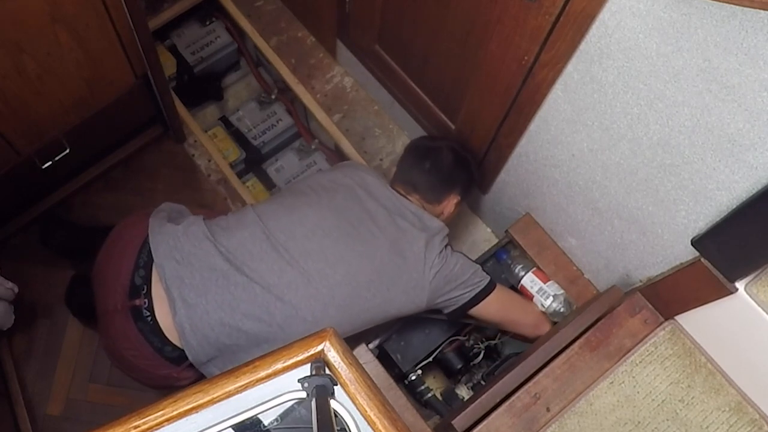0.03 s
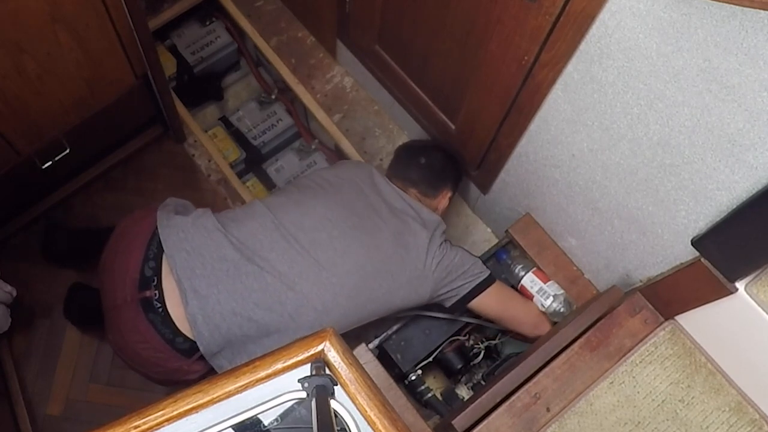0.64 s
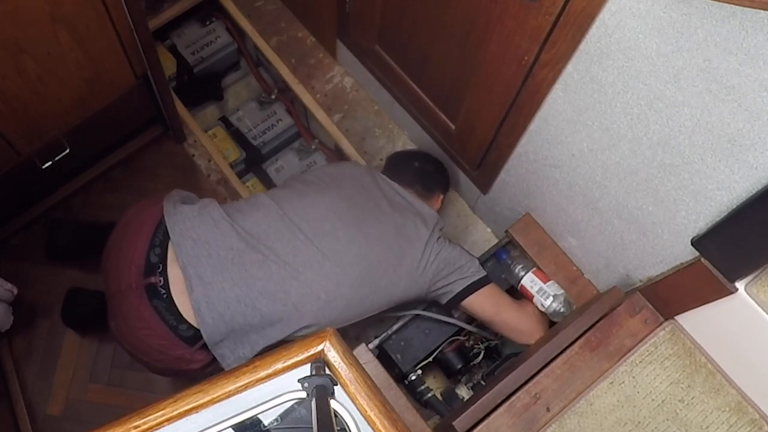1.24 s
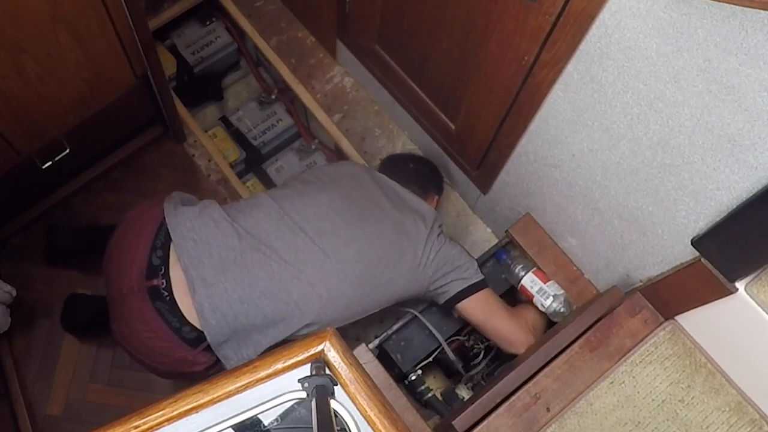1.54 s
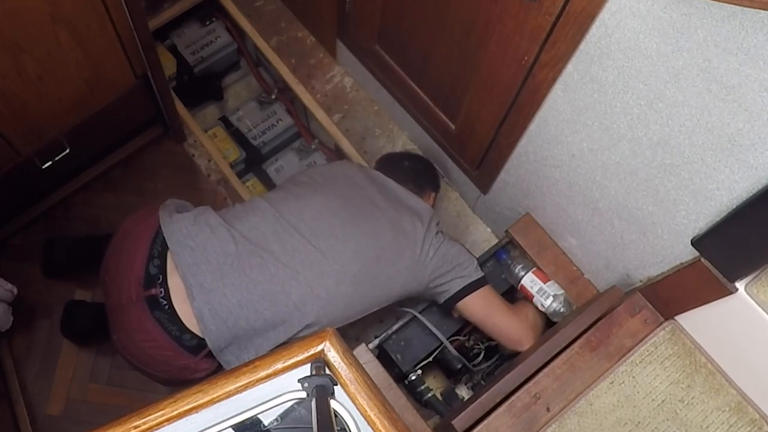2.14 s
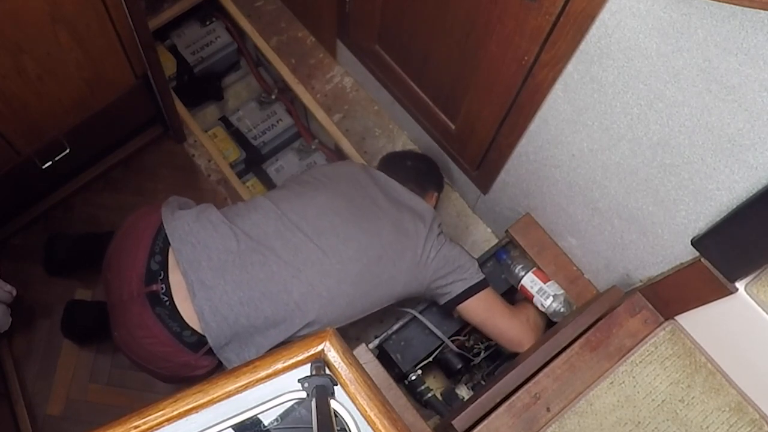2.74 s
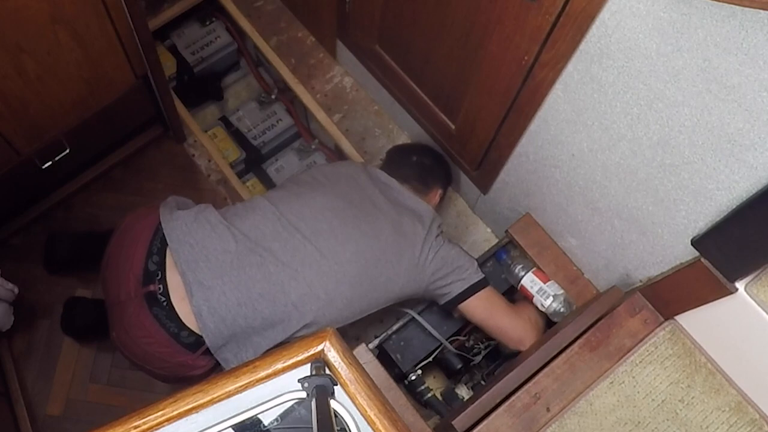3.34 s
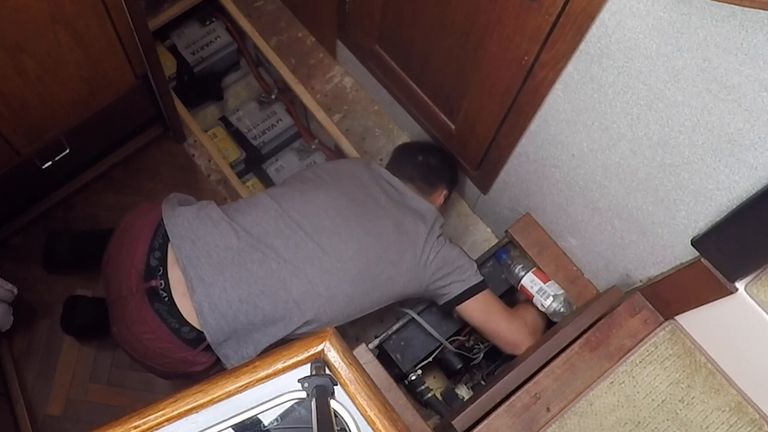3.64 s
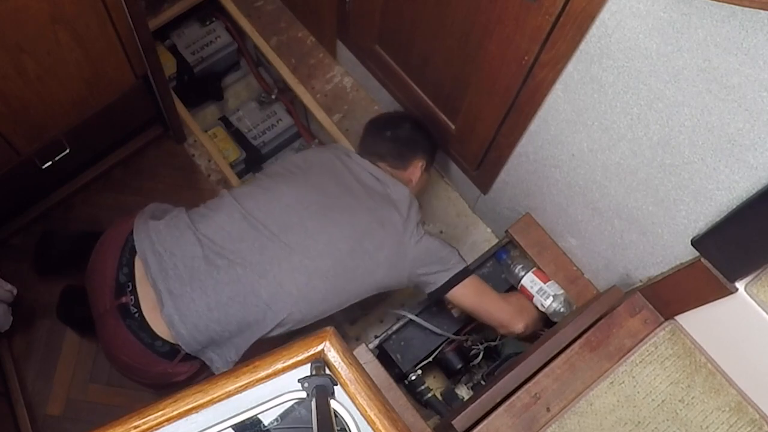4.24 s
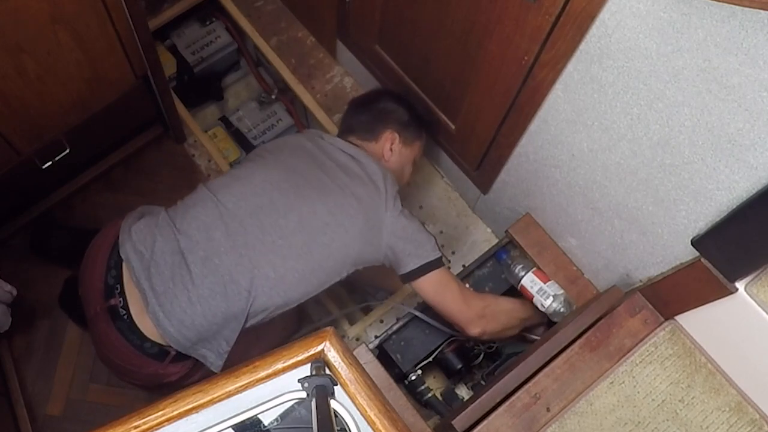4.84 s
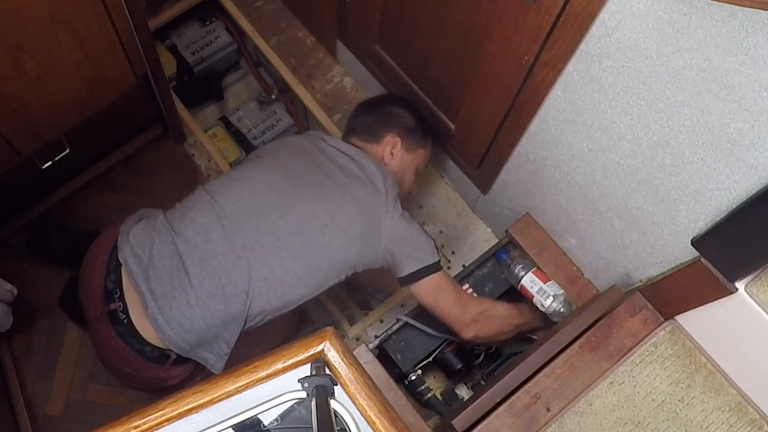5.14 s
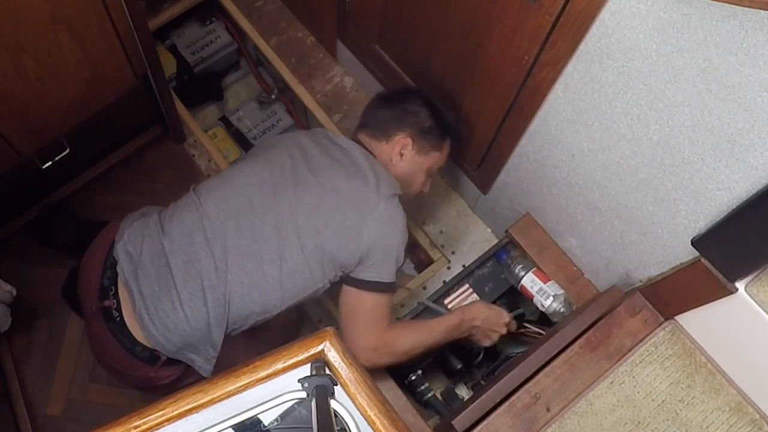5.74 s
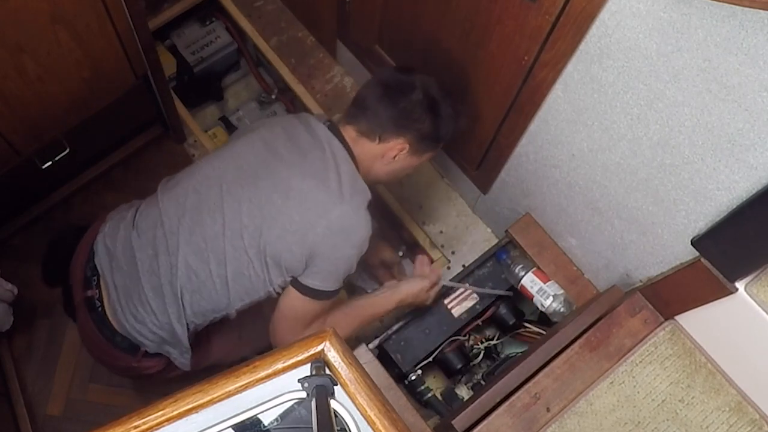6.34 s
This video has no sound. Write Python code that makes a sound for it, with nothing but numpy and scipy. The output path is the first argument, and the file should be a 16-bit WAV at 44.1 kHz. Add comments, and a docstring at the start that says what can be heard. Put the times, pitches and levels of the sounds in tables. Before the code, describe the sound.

Dull, uneven thuds boom briefly in a small wooden boat cabin as a cable is pushed around inside a tight compartment. Light clicks, hollow taps and short scrapes cluster around the thuds. The heaviest bump lands about halfway through, followed by soft sleeve brushes on wood and a busier run of ticks, knocks and dragging near the end. A low rumble and faint microphone hiss lie underneath.

```python
"""A stiff cable is worked into a cramped locker by someone kneeling in a small wooden boat cabin.
It knocks hollowly, ticks on fittings, scrapes and drags, all coloured by the locker's standing waves.
Soft blows ring the modes of hull, floorboards and locker panels; shifting weight keeps them rumbling.
Clothes rustle and brush on wood over a faint microphone hiss."""
import sys
import numpy as np
from scipy import signal
from scipy.fft import rfft, irfft, next_fast_len
from scipy.io import wavfile
from scipy.ndimage import uniform_filter1d, map_coordinates

SR = 44100
rng = np.random.default_rng(int(sys.argv[2]) if len(sys.argv) > 2 else 0)


def waveform_to_disk(signal):
    """Save audio, clipped to [-1, 1], as 16-bit WAV at the path in sys.argv[1]."""
    frames = np.transpose(np.atleast_2d(signal))
    scaled = np.clip(frames, -1, 1) * 32767
    samples = np.round(scaled).astype(np.int16)
    wavfile.write(sys.argv[1], SR, samples)


N = 282483

# Event and spectrum levels are relative.
# soft blows: t/s, floorboard/dB, hull/dB, panel/dB
BLOWS = [(0.003, -29, -17.5, -28.5), (0.552, -35.5, -36, -38), (0.615, -34.5, -28, -25),
         (0.871, -25.5, -49, -28), (0.915, -19, -24, -29), (0.978, -18, -10.5, -25),
         (1.551, -28.5, -35, -35.5), (1.637, -15.5, -14.5, -16.5), (1.691, -19, -23.5, -20),
         (1.983, -31, -31, -33.5), (2.03, -5, -11, -16.5), (2.133, -22, -19.5, -34.5),
         (2.297, -21.5, -11.5, -25.5), (2.377, -27.5, -19.5, -26), (3.213, -7, -9.5, -6),
         (3.238, -9.5, -3.5, -15.5), (3.426, -32, -24, -32.5), (3.903, -39.5, -42, -33.5),
         (3.992, -38, -29, -30), (4.091, -23, -14, -23), (4.134, -29, -28, -23.5),
         (4.249, -32, -22.5, -29.5), (4.387, -18, -18.5, -21), (4.984, -25.5, -22.5, -18),
         (5.328, -28.5, -25, -32), (5.475, -13, -16.5, -19.5), (5.857, -25, -19.5, -28),
         (6.109, -25.5, -19.5, -31.5), (6.229, -14.5, -15, -22)]
# loss of the settling bump: floorboard/dB, hull/dB, panel/dB
SETTLE_LOSS_DB = [4.5, 5, 10]
# wood modes: f/Hz, level/dB, t60/s
HULL_MODES = [(28.1, -10, 0.35), (41.6, 0.5, 0.095), (48.45, -4, 0.63), (63.7, -5.5, 0.36),
              (79.2, -8.5, 0.61)]
BOARD_MODES = [(111, -39, 0.26), (116.8, -9, 0.35), (141.7, -7, 0.33), (157.5, -3, 0.16),
               (172.75, -5, 0.25)]
PANEL_MODES = [(210.1, 5.5, 0.14), (230.2, 3.5, 0.32), (248.4, 2, 0.26), (284.2, -7, 0.25),
               (301.7, 3, 0.083), (326.8, -1.5, 0.17), (340, -2, 0.085), (428, -23, 0.11), (486, -34, 0.26)]
# arm motion, quiet reaching in, busy drawing out: t/s, cable rub/dB, cloth/dB
ARM_MOTION = [(0.0, -52.5, -58), (0.71, -51, -57.5), (0.84, -44, -57.5), (1.41, -53.5, -54),
              (2.0, -58, -58.5), (2.25, -55, -57.5), (2.51, -55, -59.5), (2.8, -58.5, -59),
              (3.14, -52, -58.5), (3.51, -58, -58.5), (3.94, -49, -55), (4.25, -46, -53), (4.64, -55, -58),
              (4.99, -55, -56.5), (5.28, -42.5, -46), (5.64, -45.5, -49.5), (5.87, -49.5, -56.5),
              (6.41, -43, -47.5)]
# ticks on fittings: t/s, level/dB, body f/Hz, sparkle/dB, ring f/Hz
FITTING_TICKS = [(0.103, -51, 2700, -42, 2660), (0.318, -39, 1500, -16, 2400),
                 (0.548, -40.5, 5800, -17, 5900), (0.595, -42, 1500, -33, 3500),
                 (0.687, -42, 2720, -38, 2680), (0.873, -32.5, 1700, -30, 2770),
                 (1.063, -38.5, 1500, -14, 2310), (1.198, -32.5, 1920, -27, 3920),
                 (1.225, -38.5, 2000, -8, 1910), (1.300, -28.5, 2300, -27, 1790),
                 (1.472, -34, 1880, -40, 2410), (1.603, -36, 1800, -25, 2540),
                 (1.708, -32.5, 2260, -31, 2380), (2.019, -36.5, 1740, -22, 1660),
                 (2.305, -31.5, 4200, -39, 4770), (2.951, -44, 4000, -16, 4500),
                 (3.141, -42, 1460, -10, 2890), (3.206, -24, 1500, -19, 7050),
                 (3.256, -31, 1380, -26, 4800), (3.314, -39, 1390, -11, 4460),
                 (3.614, -37, 2480, -25, 2550), (4.122, -38, 2200, -42, 2190),
                 (5.179, -28.5, 3700, -21, 2880), (5.316, -29.5, 1430, -15, 2260),
                 (5.362, -26.5, 1900, -23, 1860), (5.392, -26, 1440, -18, 2280),
                 (5.519, -43.5, 3860, 14, 9000), (5.613, -35.5, 2900, -19, 2200),
                 (5.769, -28.5, 3900, -27, 5130), (6.013, -29.5, 2080, -14, 2640)]
# cable knocks: t/s, level/dB, f/Hz, Q
CABLE_KNOCKS = [(0.337, -33.5, 680, 5.1), (0.699, -27.5, 757, 5.3), (0.714, -30.5, 710, 11),
                (0.795, -29.5, 617, 12), (0.842, -31, 570, 3.5), (0.911, -33, 766, 8.4),
                (1.472, -38.5, 700, 9.8), (1.604, -33.5, 1180, 4.5), (1.644, -34.5, 1040, 2.1),
                (1.986, -34.5, 614, 3.7), (2.013, -28.5, 725, 20), (2.121, -32.5, 794, 14),
                (2.137, -28.5, 483, 11.5), (2.31, -31.5, 476, 1.5), (2.339, -35.5, 1120, 6.9),
                (2.394, -28, 665, 9.6), (2.419, -32.5, 980, 18), (3.067, -35.5, 1180, 4.8),
                (3.148, -22.5, 734, 6.5), (3.179, -24, 683, 4.9), (3.215, -14.5, 375, 4.4),
                (4.053, -34.5, 1260, 9.2), (4.084, -28.5, 627, 7.1), (4.113, -31, 620, 9.9),
                (4.233, -28, 700, 6.4), (4.261, -32, 660, 5.8), (5.185, -32, 680, 6), (5.32, -26, 730, 6.3),
                (5.364, -29, 900, 20), (5.394, -19.5, 665, 11), (5.863, -32, 440, 5),
                (6.108, -32.5, 750, 5)]
# cable scrapes: t/s, length/s, level/dB, f/Hz
CABLE_SCRAPES = [(0.376, 0.06, -48, 1390), (0.6, 0.036, -46.5, 2780), (0.804, 0.049, -36, 600),
                 (0.831, 0.1, -38, 1060), (0.88, 0.1, -43, 517), (1.63, 0.11, -41, 1290),
                 (2.131, 0.072, -46, 477), (2.343, 0.053, -33, 383), (2.799, 0.19, -45, 457),
                 (3.216, 0.095, -38, 1290), (3.546, 0.12, -41.5, 452), (3.629, 0.084, -46, 2600),
                 (3.621, 0.11, -39.5, 670), (3.852, 0.06, -39, 394), (3.974, 0.052, -38, 480),
                 (4.012, 0.05, -49, 1870), (4.383, 0.065, -37.5, 680), (5.03, 0.075, -43, 1700),
                 (5.084, 0.043, -37, 680), (5.18, 0.055, -43.5, 1750), (5.317, 0.053, -29.5, 394),
                 (5.33, 0.035, -41, 1860), (5.371, .06, -38, 930), (5.668, 0.059, -43.5, 2200),
                 (6.04, 0.18, -37, 646), (6.224, 0.062, -37, 453)]
# shirt and sleeve brushes: t/s, length/s, level/dB
SLEEVE_PASSES = [(4.114, 0.21, -50.5), (4.319, 0.21, -50), (5.052, 0.15, -51.5), (6.004, 0.16, -50),
                 (6.124, 0.24, -50.5)]
# source spectra: f/Hz, level/dB
BOOM_SPECTRUM = [(30, -29.5), (70, -20.5), (100, -3.5), (120, -0.5), (170, -0.5), (240, -7.5), (275, -2.5),
                 (325, -2.5), (375, -20), (600, -23.5), (1200, -31.5), (3000, -87.5)]
HULL_SPECTRUM = [(8, -8.5), (20, -6), (30, 4), (39, -3.5), (48, 0), (58, -11), (85, -11.5), (130, -27),
                 (300, -72)]
WOODWORK_SPECTRUM = [(60, -6), (118, 7), (140, 4), (168, 5), (195, -4.5), (240, 1), (275, -9), (320, -12),
                     (380, -9.5), (700, -49), (2500, -85)]
RUB_SPECTRUM = [(200, -13), (400, -4), (520, 0.5), (680, 1), (900, -2), (1300, -13.5), (2200, -40.5),
                (5000, -62)]
CLOTH_SPECTRUM = [(500, -21.5), (1200, 1.5), (2500, -0.5), (4500, -4), (6500, -11.5), (10000, -18.5)]
HISS_SPECTRUM = [(300, 2.1), (3000, 4.4), (6000, 6.6), (10000, 2.5)]
KNOCK_SPECTRUM = [(100, -30), (300, 7), (480, 2), (670, 0.5), (900, 0), (1400, -7.5), (3000, -7),
                  (7000, -11), (15000, -23)]
SLEEVE_SPECTRUM = [(800, -17), (2000, 8.5), (4000, 7.5), (6500, 5.5), (9000, -2.5), (11000, -0.5)]
# cabin reverberation: f/Hz, base t60/s
CABIN_DECAY = [(50, 1), (250, 0.35), (700, 0.28), (2000, 0.31), (6000, 0.21), (14000, 0.041)]
# locker standing waves: f/Hz, width/Hz, lift/dB
LOCKER_MODES = [(488, 58, 1), (583, 13, 3.5), (670, 17, 3), (779, 6.7, 0.5), (862, 6.7, -13.5),
                (1100, 15, 3.5), (1290, 11, 6.5), (1446, 79, 4), (1860, 5, 3.5), (2200, 59, 2),
                (2620, 46, 2)]
# microphone response: f/Hz, gain/dB
MIC_RESPONSE = [(10000, 0), (13000, -2), (15400, -4.5)]

SCENE_S = np.arange(N) / SR
EVENT_S = np.arange(SR * 3 // 4) / SR


def amp(db):
    """dB to gain."""
    return 10 ** (np.asarray(db) / 20)


def unit_rms(x):
    """Scale to rms 1."""
    return x / np.sqrt(np.mean(x ** 2) + 1e-20)


def unit_hit(x, window_samples=882):
    """Scale the loudest window to rms 1."""
    return x / np.sqrt(uniform_filter1d(x ** 2, window_samples).max() + 1e-20)


def along(points, hz):
    """Interpolate (f/Hz, value) points on a log axis."""
    knots_hz, values = np.transpose(points)
    return np.interp(np.log(hz + 1), np.log(knots_hz), values)


def wobble(rate_hz):
    """Smooth random curve, rate_hz knots a second."""
    knots = rng.standard_normal(int(N * rate_hz / SR) + 4)
    return map_coordinates(knots, [SCENE_S * rate_hz])


def coloured(x, gain_db):
    """Minimum-phase filter with response gain_db(hz)."""
    size = 2 * next_fast_len(len(x) // 2 + 4096)
    gain = amp(gain_db(np.fft.rfftfreq(size, 1 / SR)))
    cepstrum = irfft(np.log(np.maximum(gain, 1e-6)), size)
    cepstrum[1:size // 2] *= 2
    cepstrum[size // 2 + 1:] = 0
    return irfft(rfft(x, size) * np.exp(rfft(cepstrum)), size)[:len(x)]


def shaped(x, spectrum):
    """Filter by a spectrum table; rms 1."""
    return unit_rms(coloured(x, lambda hz: along(spectrum, hz)))


def noise(spectrum):
    """Steady shaped noise; rms 1."""
    return shaped(rng.standard_normal(N), spectrum)


def resonance_db(hz, centre_hz, q):
    """One resonance, 0 dB at its peak."""
    return -10 * np.log10(1 + q ** 2 * ((hz + 1) / centre_hz - centre_hz / (hz + 1)) ** 2)


def add(track, at_s, x):
    """Mix x into track at at_s."""
    start = max(round(at_s * SR), 0)
    track[start:start + len(x)] += x[:max(N - start, 0)]


def cabin_tail(decay_scale):
    """Dense cabin reflections, treble dying first; energy 1."""
    hz, t, bins = signal.stft(rng.standard_normal(len(EVENT_S)), SR, nperseg=256)
    t60_s = decay_scale * along(CABIN_DECAY, hz)[:, None]
    tail = signal.istft(bins * amp(-60 * t / t60_s), SR, nperseg=256)[1][:len(EVENT_S)]
    return tail / np.linalg.norm(tail)


def contact(t60_s, room_db, decay_scale):
    """Short crack plus cabin reflections."""
    crack = rng.standard_normal(len(EVENT_S)) * amp(-60 * EVENT_S / t60_s)
    return crack / np.linalg.norm(crack) + amp(room_db) * cabin_tail(decay_scale)


def ring(modes, attack_s, scatter_db):
    """Modes swell and decay; strengths vary with the spot struck."""
    hz, db, t60_s = np.transpose(modes)[:, :, None]
    envelopes = amp(db + scatter_db * rng.standard_normal(hz.shape) - 60 * EVENT_S / t60_s)
    waves = envelopes * np.sin(2 * np.pi * (hz * EVENT_S + rng.random(hz.shape)))
    onset = 1 - np.exp(-(EVENT_S / attack_s) ** 2)
    return unit_hit(waves.sum(0) * onset)


def settling(blows, delay_s=0.046, ceiling_db=-21):
    """Each blow, then a softer bump as the weight settles."""
    for at_s, *levels_db in blows:
        yield at_s, *levels_db
        yield at_s + delay_s, *np.minimum(np.array(levels_db) - SETTLE_LOSS_DB, ceiling_db)


def thumps(lead_s=0.00529):
    """Soft blows ring hull, floorboards and panels, and boom briefly in the cabin."""
    out = np.zeros(N)
    for at_s, board_db, hull_db, panel_db in settling(BLOWS):
        weight_db = 0.89 * (hull_db - board_db) + 3  # heavier: more low board modes
        hardness_db = 0.5 * (panel_db - board_db) + 2.5  # harder: more high panel modes
        board_tilt = [(120, weight_db), (160, 0.011)]
        panel_tilt = [(240, -1.5), (310, hardness_db), (400, -7)]
        boom_tilt = [(170, board_db), (220, panel_db), (320, panel_db + hardness_db)]
        boards = [(hz, db + along(board_tilt, hz), t60_s) for hz, db, t60_s in BOARD_MODES]
        panels = [(hz, db + along(panel_tilt, hz), t60_s) for hz, db, t60_s in PANEL_MODES]
        wood = amp(hull_db - 4) * ring(HULL_MODES, attack_s=0.0092, scatter_db=1.3)
        wood += amp(board_db - 4.5) * ring(boards, attack_s=0.011, scatter_db=3.5)
        wood += amp(panel_db - 7.5) * ring(panels, attack_s=0.017, scatter_db=2.1)
        tail = cabin_tail(decay_scale=0.89)
        boom = coloured(tail, lambda hz: along(BOOM_SPECTRUM, hz) + along(boom_tilt, hz))
        add(out, at_s - lead_s, wood + amp(36) * boom)
    return out


def effort(pushes, rise_s, fall_s):
    """Gain rising to each (t/s, level/dB) push, then easing; overlaps add in power."""
    power = np.zeros(N)
    for at_s, db in pushes:
        age_s = SCENE_S - at_s
        power += (amp(db) * np.exp(np.minimum(age_s / rise_s, -age_s / fall_s))) ** 2
    return np.sqrt(power)


def rocking(hull_rest_db=-36.5, wood_rest_db=-47, roll_db=-10.5, flex_db=-21.5):
    """Shifting weight rolls the hull and flexes the woodwork: rumble, strongest around blows."""
    hull_pushes = [(at_s, hull_db) for at_s, _, hull_db, _ in BLOWS]
    wood_pushes = [(at_s, max(board_db, panel_db)) for at_s, board_db, _, panel_db in BLOWS]
    roll = amp(roll_db) * effort(hull_pushes, rise_s=0.022, fall_s=0.14)
    flex = amp(flex_db) * effort(wood_pushes, rise_s=0.03, fall_s=0.1)
    hull = np.hypot(amp(hull_rest_db), roll) * noise(HULL_SPECTRUM)
    wood = np.hypot(amp(wood_rest_db), flex) * noise(WOODWORK_SPECTRUM)
    return hull + wood


def friction(spectrum, slips_per_s, spread_db, smooth_db):
    """Tiny uneven slips echo in the cabin over a smooth slide."""
    slipping = rng.random(N) < slips_per_s / SR
    slips = slipping * amp(spread_db * np.minimum(rng.exponential(size=N), 3))
    grains = signal.fftconvolve(slips, contact(t60_s=0.0036, room_db=20, decay_scale=0.8))[:N]
    return unit_rms(shaped(grains, spectrum) + amp(smooth_db) * noise(spectrum))


def dragging(shove_db=-30.5, rub_trim_db=-1.5, waver_db=2.13):
    """Cable rub and cloth rustle follow the arm; each floorboard blow adds rub."""
    times_s, *columns_db = np.transpose(ARM_MOTION)
    rub_db, cloth_db = (np.interp(SCENE_S, times_s, db) for db in columns_db)
    board_pushes = [(at_s, board_db) for at_s, board_db, _, _ in BLOWS]
    shoves = amp(shove_db) * effort(board_pushes, rise_s=0.018, fall_s=0.074)
    pull = np.hypot(amp(rub_db + rub_trim_db), shoves) * amp(waver_db * wobble(rate_hz=13))
    rub = pull * friction(RUB_SPECTRUM, slips_per_s=130, spread_db=1.5, smooth_db=-2)
    cloth = amp(cloth_db) * friction(CLOTH_SPECTRUM, slips_per_s=82, spread_db=2, smooth_db=-1)
    return rub + cloth


def locker(x):
    """Standing waves colour sounds made inside the locker."""
    def lift_db(hz):
        return sum(db * amp(2 * resonance_db(hz, centre_hz, q=centre_hz / width_hz))
                   for centre_hz, width_hz, db in LOCKER_MODES)
    return coloured(x, lift_db)


def hiss(level_db=-60.5):
    """Faint, steady microphone noise."""
    return amp(level_db) * noise(HISS_SPECTRUM)


def ticks(window_samples=176):
    """Hard contacts: a broad snap plus the fitting's short ring."""
    out = np.zeros(N)
    for at_s, db, body_hz, sparkle_db, ring_hz in FITTING_TICKS:
        ring_db = -20.5 - 0.49 * sparkle_db  # clean taps ring, gritty ones sparkle
        edge = [(200, -12), (700, 8.5), (3100, 1), (8000, sparkle_db + 12.5), (11000, sparkle_db + 5.5)]
        hit = contact(t60_s=0.04, room_db=9.5, decay_scale=0.69)
        snap = coloured(hit, lambda hz: along(edge, hz) + resonance_db(hz, body_hz, q=0.72))
        tink = coloured(hit, lambda hz: 2 * resonance_db(hz, ring_hz, q=11))
        tick = unit_hit(snap, window_samples) + amp(ring_db) * unit_hit(tink, window_samples)
        add(out, at_s, amp(db - 6.5) * tick)
    return out


def knocks(attack_s=0.0046, lead_s=0.004):
    """The rubbery cable bumps the locker; each spot has its own hollow pitch."""
    out = np.zeros(N)
    sheath_give = 1 - np.exp(-EVENT_S / attack_s)
    for at_s, db, pitch_hz, q in CABLE_KNOCKS:
        hit = contact(t60_s=0.034, room_db=7.5, decay_scale=0.6) * sheath_give
        hollow = coloured(hit, lambda hz: along(KNOCK_SPECTRUM, hz) + resonance_db(hz, pitch_hz, q))
        add(out, at_s - lead_s, amp(db - 6) * unit_hit(hollow))
    return out


def scrapes(slips_per_s=700):
    """Cable strokes: swells of uneven slips ring at the rubbed spot's pitch."""
    out = np.zeros(N)
    size = len(EVENT_S)
    for at_s, length_s, db, pitch_hz in CABLE_SCRAPES:
        pressure = np.sqrt(np.abs(np.sin(np.pi * np.minimum(EVENT_S / length_s, 1))))
        slips = (rng.random(size) < slips_per_s / SR) * rng.standard_normal(size) * pressure
        grains = signal.fftconvolve(slips, contact(t60_s=0.01, room_db=3, decay_scale=0.47))[:size]
        stroke = coloured(grains, lambda hz: 2 * resonance_db(hz, pitch_hz, q=1.8))
        add(out, at_s, amp(db - 3) * unit_hit(stroke))
    return out


def swishes():
    """Fabric brushes wood: each pass swells and fades, grainy as the weave catches."""
    passes = sum(amp(db) * np.sin(np.pi * np.clip((SCENE_S - at_s) / length_s, 0, 1))
                 for at_s, length_s, db in SLEEVE_PASSES)
    weave_db = 1.8 * wobble(rate_hz=45) + 1.2 * wobble(rate_hz=700)
    return passes * shaped(amp(weave_db) * rng.standard_normal(N), SLEEVE_SPECTRUM)


def scene():
    """Mono mix of the cabin."""
    in_locker = locker(knocks() + ticks() + scrapes() + dragging())
    return (thumps() + in_locker + swishes() + rocking() + hiss())[None]


def record(dry):
    """Soft clip at full scale, top-octave droop, band limit."""
    knee_order, top_hz = 8, 15400
    clipped = dry / (1 + np.abs(dry) ** knee_order) ** (1 / knee_order)
    size = next_fast_len(N + SR // 2)
    hz = np.fft.rfftfreq(size, 1 / SR)
    response = amp(along(MIC_RESPONSE, hz)) * (hz < top_hz)
    return irfft(rfft(clipped, size) * response, size)[:, :N]


dry = scene()
out = record(dry)
waveform_to_disk(out)
```